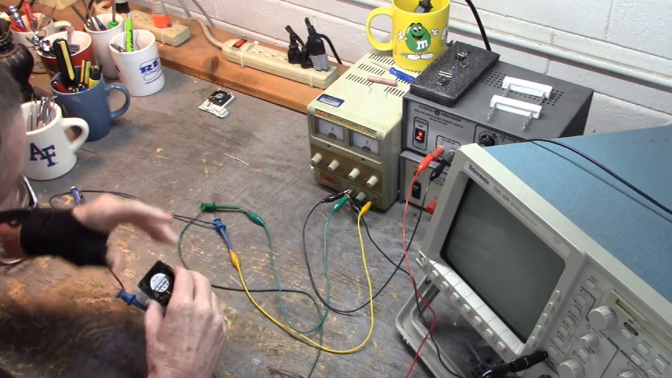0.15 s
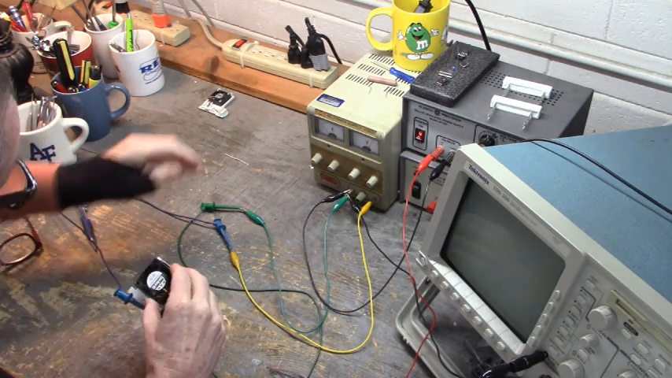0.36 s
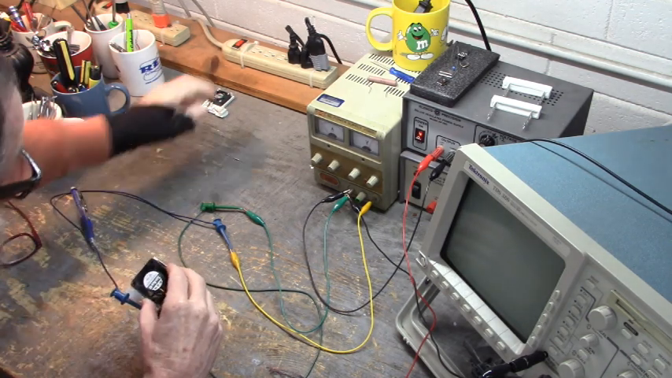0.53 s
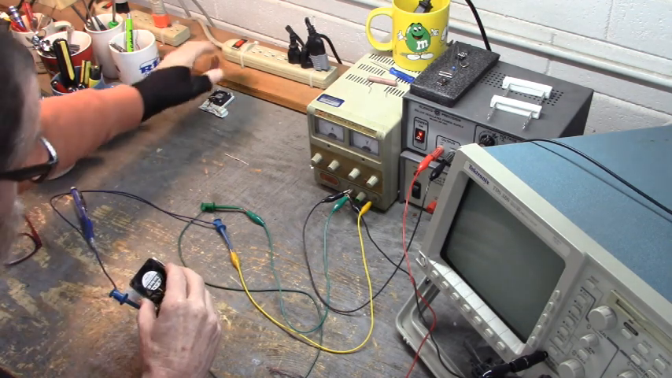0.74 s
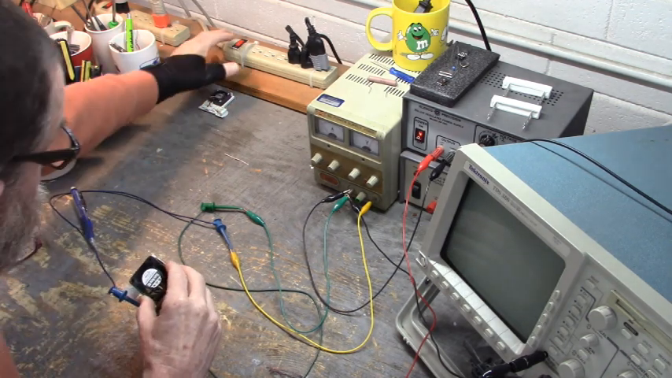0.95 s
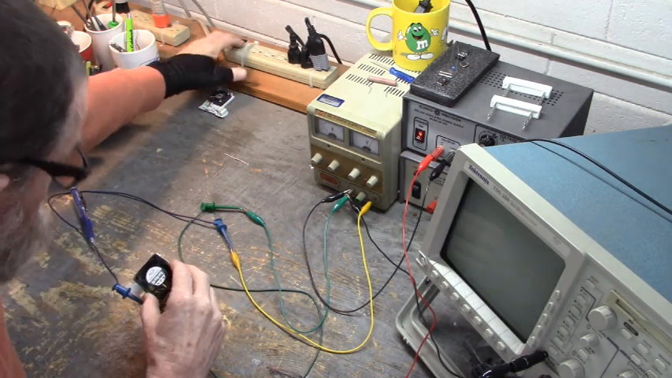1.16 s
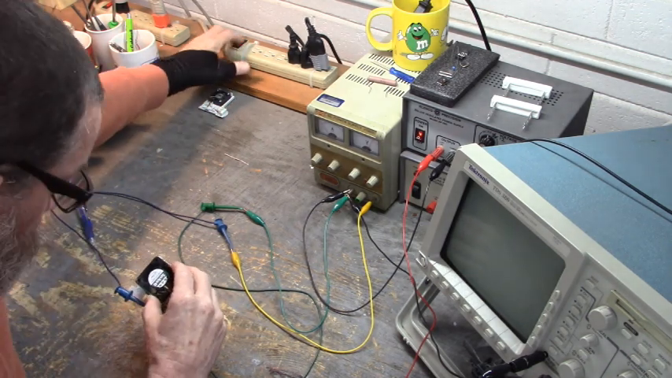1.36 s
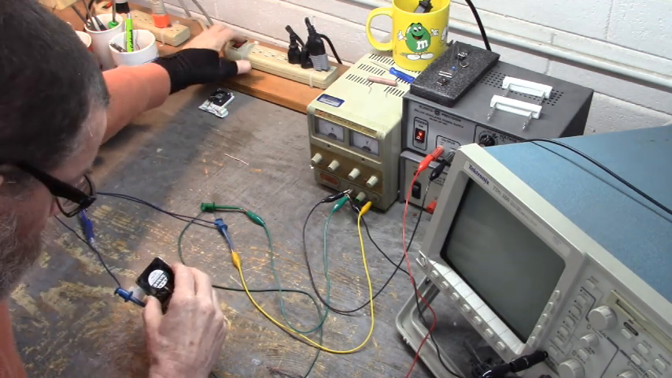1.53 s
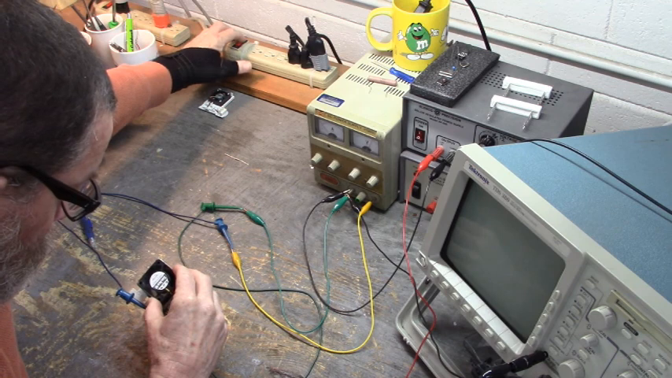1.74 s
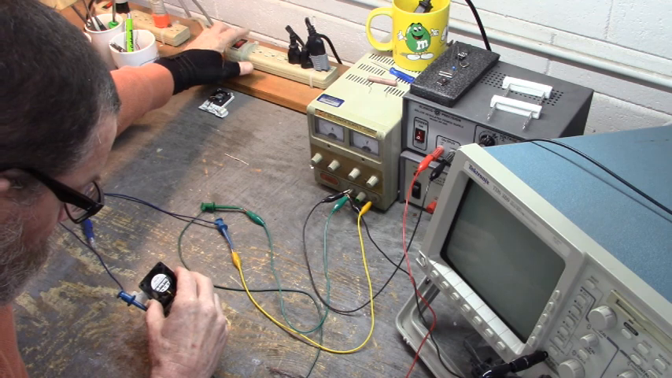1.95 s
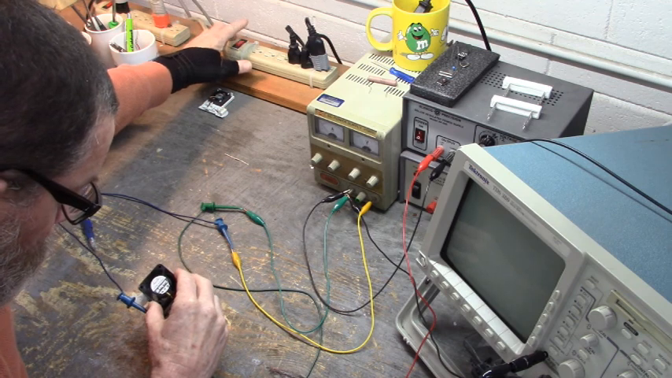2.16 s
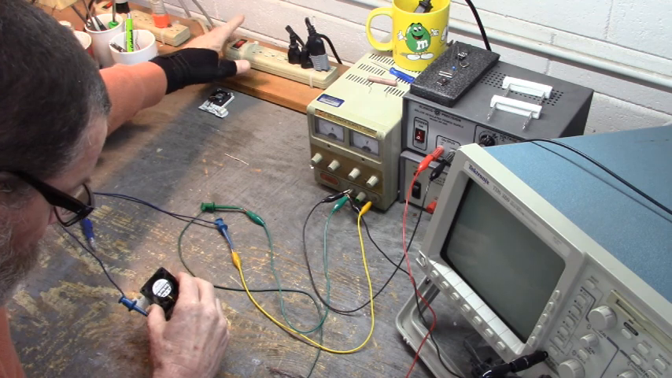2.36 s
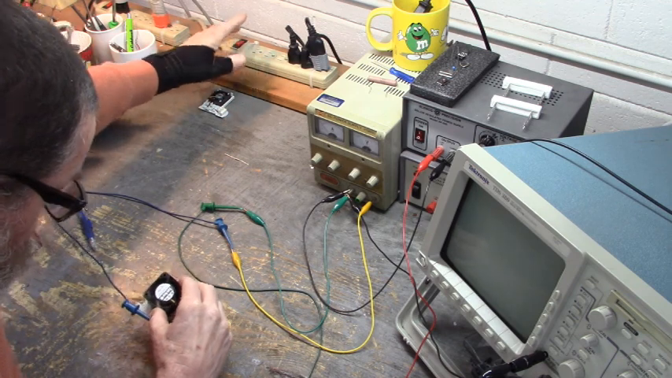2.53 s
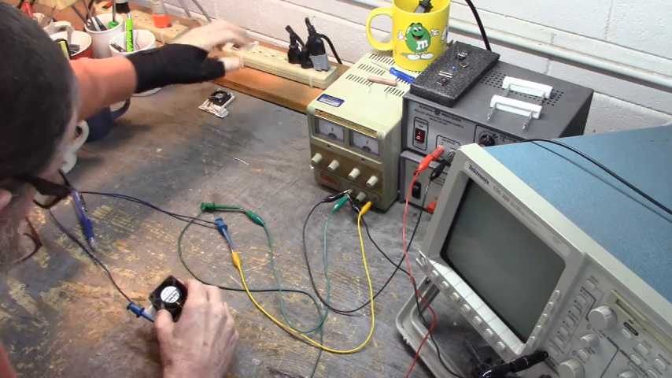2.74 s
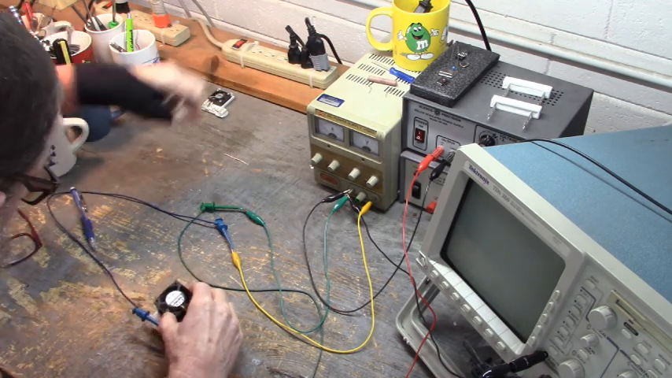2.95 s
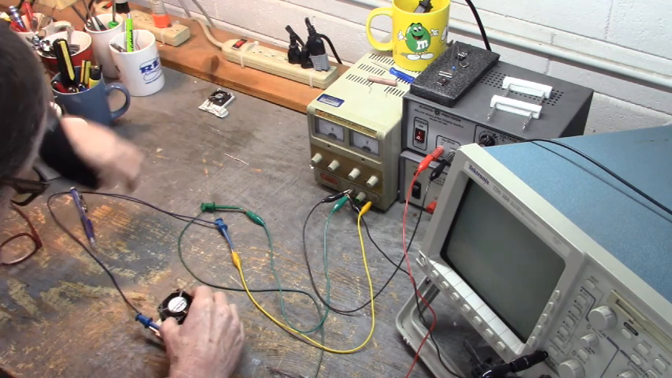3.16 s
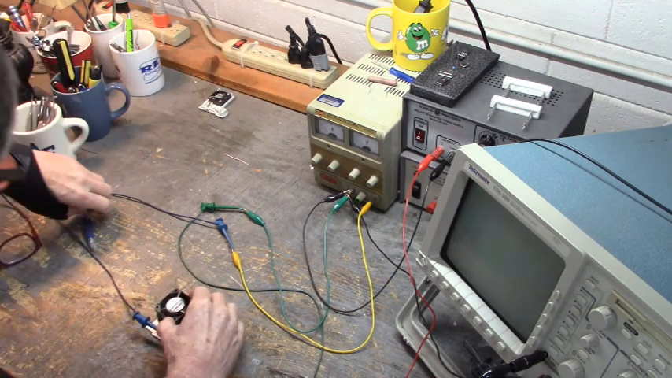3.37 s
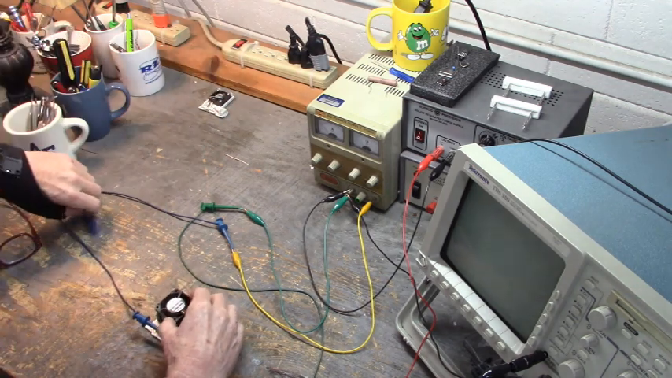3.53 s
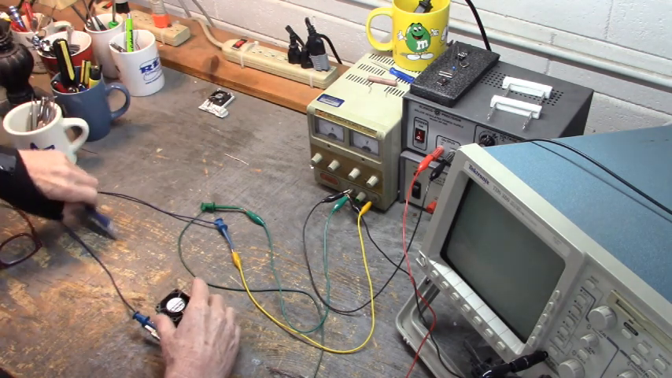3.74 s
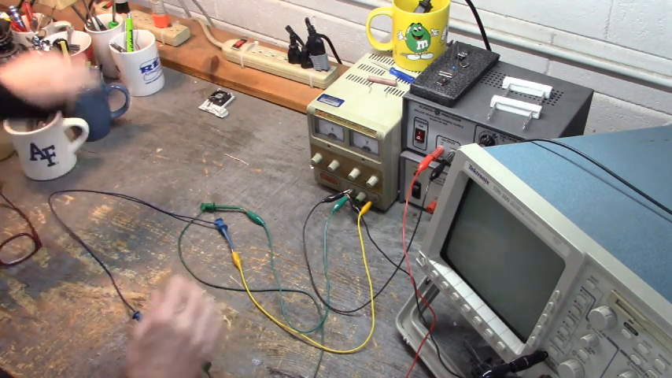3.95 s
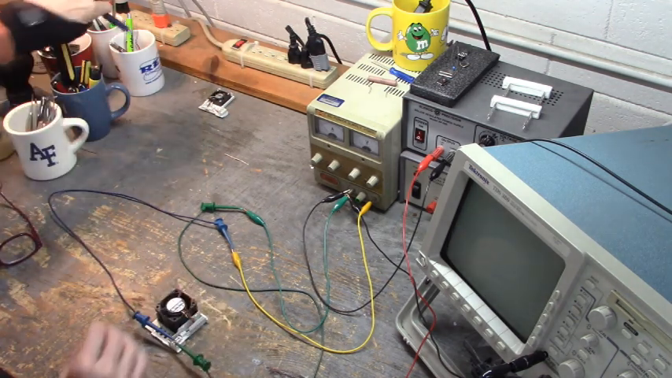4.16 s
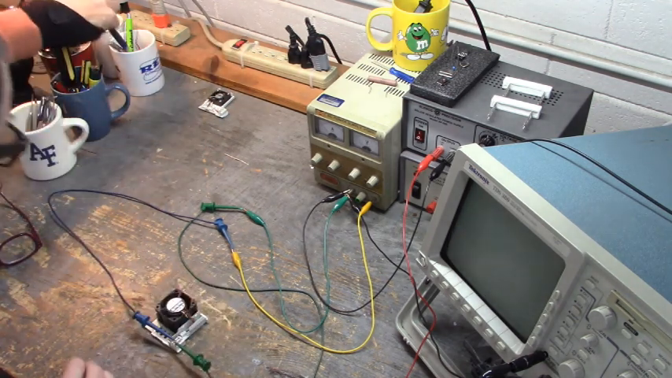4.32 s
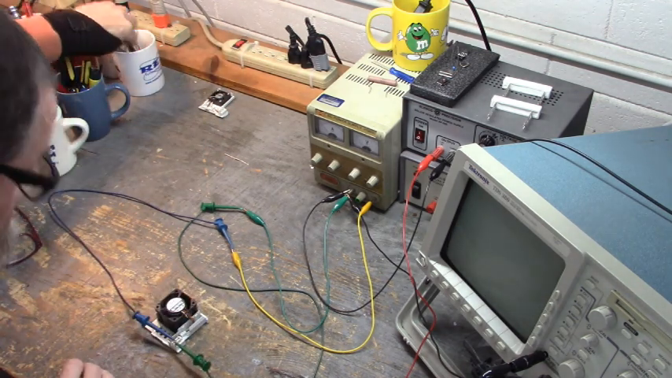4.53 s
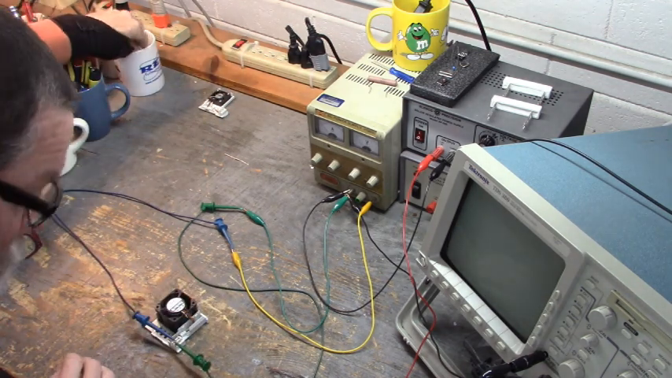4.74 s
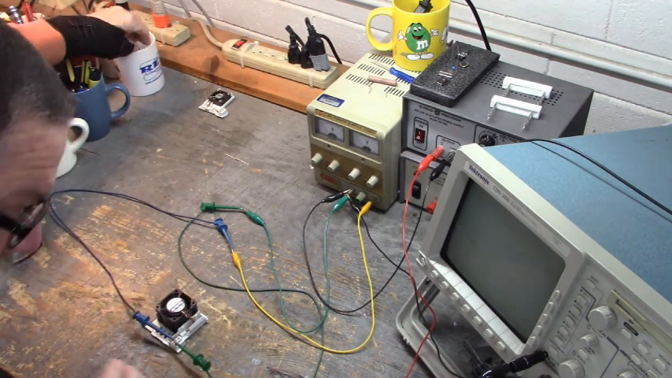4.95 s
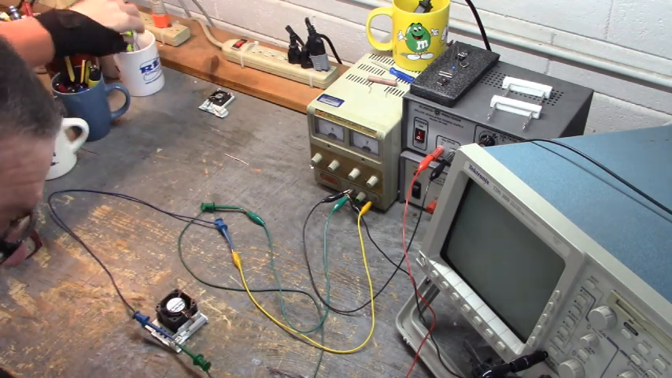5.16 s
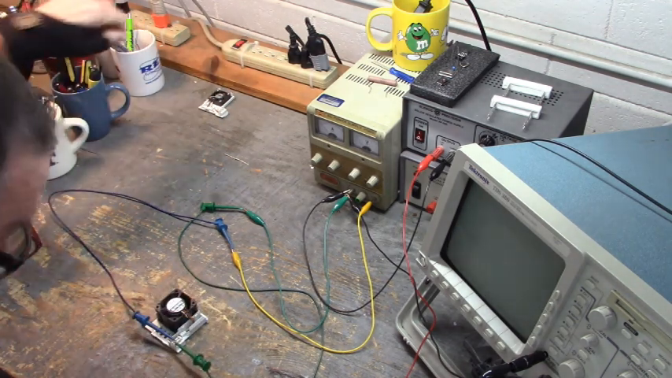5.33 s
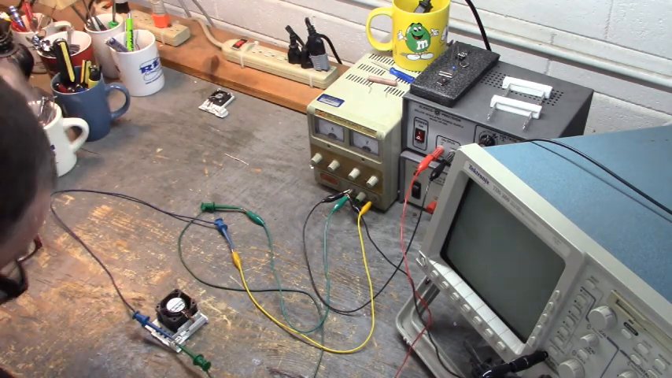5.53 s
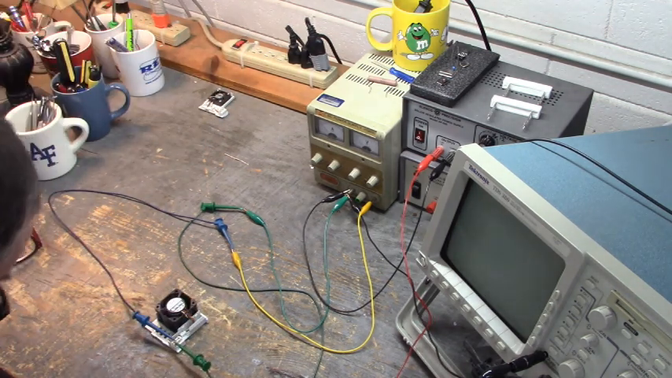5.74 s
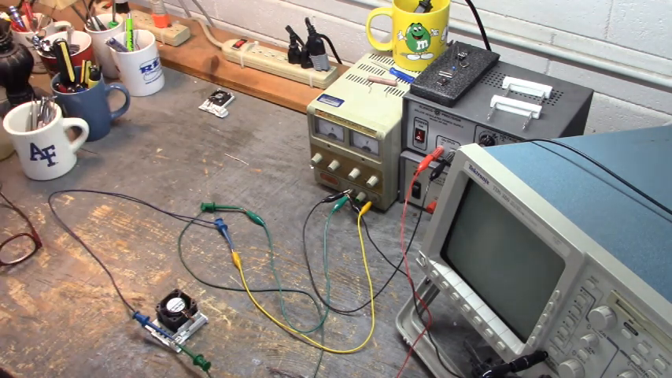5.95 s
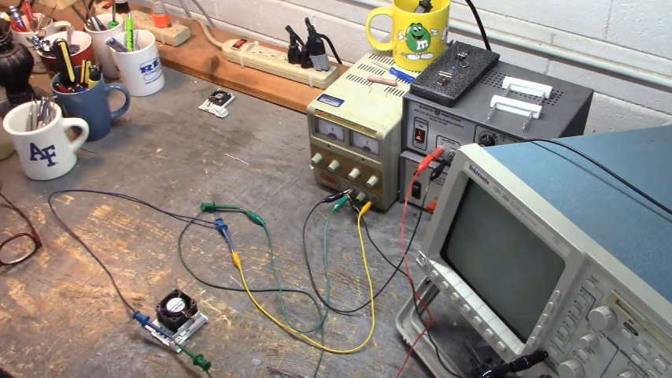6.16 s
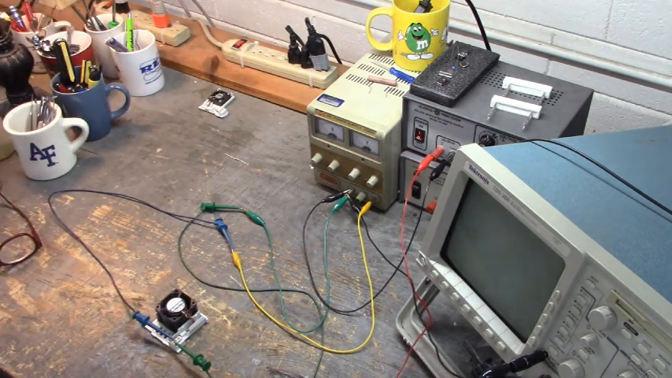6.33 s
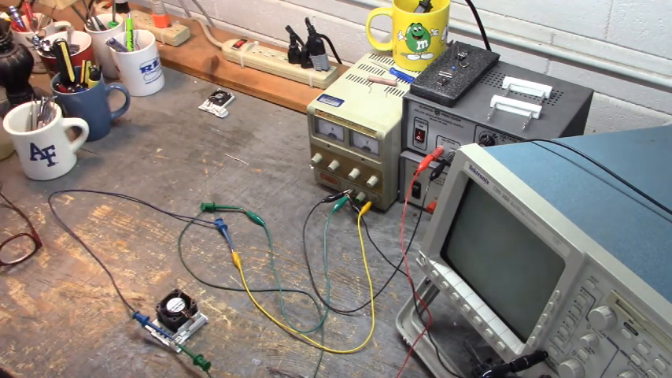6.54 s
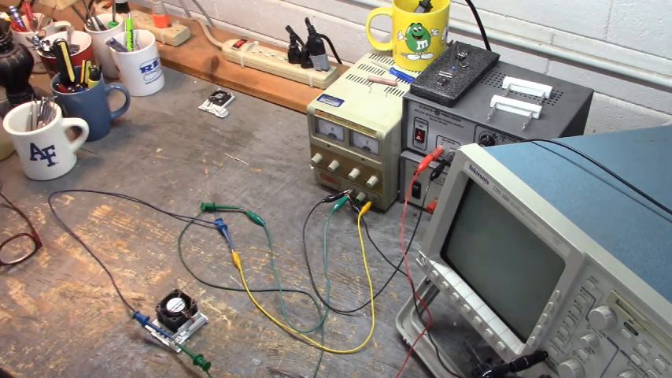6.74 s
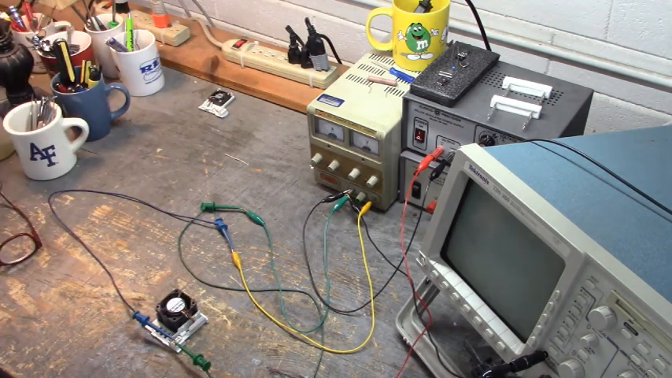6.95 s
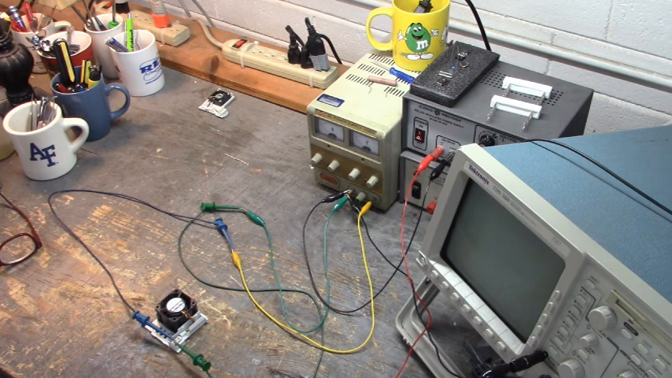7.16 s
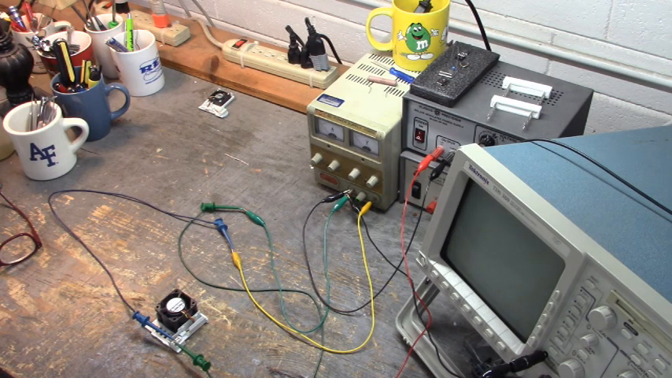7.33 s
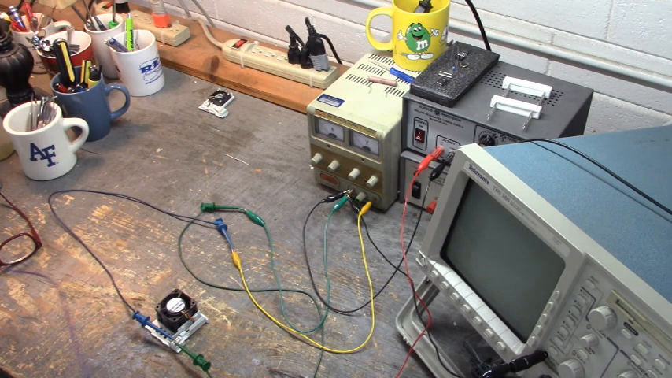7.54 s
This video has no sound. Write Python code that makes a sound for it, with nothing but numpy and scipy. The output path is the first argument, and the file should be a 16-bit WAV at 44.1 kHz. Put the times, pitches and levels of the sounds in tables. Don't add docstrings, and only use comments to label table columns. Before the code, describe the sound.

A small cooling fan whines steadily, a switch snaps, the pitch glides down and fades, then parts knock and a mug clinks on a workbench.

```python
import sys
import numpy as np
from scipy import signal
from scipy.fft import rfft, irfft
from scipy.io import wavfile
from scipy.ndimage import uniform_filter1d

SR = 44100
rng = np.random.default_rng(int(sys.argv[2]) if len(sys.argv) > 2 else 0)


def invert_db(level):
    return 10 ** (np.asarray(level, dtype=float) / 20)


def unload_wav(signal):
    wavfile.write(
        sys.argv[1],
        SR,
        np.round(np.clip(np.atleast_2d(signal).T, -1, 1) * 32767).astype(np.int16),
    )


N = 339129
HZ = np.fft.rfftfreq(512, 1 / SR)
T = np.arange(N // 128 + 5) * 128 / SR


def evened(x):
    return x / np.sqrt(np.mean(x ** 2) + 1e-20)


def read(points, hz):
    f, value = np.transpose(points)
    return np.interp(np.log(hz + 1), np.log(f + 1), value)


def follow(points, t):
    return np.interp(t, *np.transpose(points))


def add(mix, s, sound):
    part = mix[round(s * SR):][:len(sound)]
    part += sound[:len(part)]


def drift(t, top_hz, low_hz=0.284):
    coarse = t[::128]
    waves = [np.sin(2 * np.pi * (f * coarse + rng.random())) / np.sqrt(f)
             for f in np.geomspace(low_hz, top_hz, 12)]
    return np.interp(t, coarse, evened(sum(waves)))


def resonate(x, hz, width):
    turn = np.exp(2j * np.pi * np.cumsum(hz * np.ones(len(x))) / SR)
    r = np.exp(-np.pi * width / SR)
    return 2 * (turn * signal.lfilter([1 - r], [1, -r], x / turn)).real


def noise(field_db, same, patchy_db):
    a, b, c, d, patches = rng.standard_normal((len(T), len(HZ), 5)).T
    patches = uniform_filter1d(patches, size=6, axis=0)
    patches = evened(uniform_filter1d(patches, size=20, axis=1))
    same = np.clip(same, -1, 1)
    left = a + 1j * b
    right = same * left + np.sqrt(1 - same ** 2) * (c + 1j * d)
    z = np.array([left, right]) * invert_db(field_db + patchy_db * patches)
    return signal.istft(z, nperseg=512, noverlap=384)[1][:, :N]


def ring(modes, gains_db, length):
    t = np.arange(round(length * SR)) / SR
    return sum(invert_db(db + g - 60 * t / t60) * np.sin(2 * np.pi * hz * t)
               for (hz, db, t60), g in zip(modes, gains_db))


def burst(t60, rise):
    t = np.arange(4096) / SR
    return rng.standard_normal(len(t)) * invert_db(-60 * t / t60) * np.minimum(t / rise, 1)


FULL_HZ, WARMING_HZ_PER_S = 956.7, .8
COAST_S, SUPPLY_S = 1.6427, .1137
BEARING_PER_S, AIR_DRAG_HZ = .357, 911


def rotor(t):
    top = FULL_HZ + WARMING_HZ_PER_S * np.minimum(t, COAST_S)
    since = np.maximum(t - COAST_S, 0)
    braked = since - SUPPLY_S * (1 - np.exp(-since / SUPPLY_S))
    return 1 / ((1 / top + 1 / AIR_DRAG_HZ) * np.exp(BEARING_PER_S * braked) - 1 / AIR_DRAG_HZ)


# multiple of blade-pass, level in dB at full speed, power of speed,
# extra fade per squared dB of slowing.
STRONG = [(1, -37.5, 2.77, 0.35), (3, -46.5, 0.51, 0.14), (4, -37.5, 1.02, 0.36), (8, -50, 4.5, 0.5)]
# multiple of blade-pass, level in dB at full speed,
# change in dB when the motor drive stops.
ORDERS_DB = [(2, -54, 8), (5, -52.5, 0.5), (6, -48, -4), (7, -65, 8.5), (9, -56.5, -6.5), (10, -62, -4),
             (11, -75, 11), (12, -72, 4), (2.4, -67, 2), (3.2, -67, -3), (2.962, -55.5, -11),
             (5.963, -56, -8), (6.037, -56, 0)]
# multiple of blade-pass, width in Hz, level in dB.
WHISTLES = [(1.48, 113, -49.5), (3.46, 70, -62.5)]
# frequency in Hz, gain in dB.
FRAME = [(500, -10), (1200, 4.5), (1600, 7.5), (2400, -1.5), (4400, -3.5), (5600, 5.5), (6500, -3),
         (7300, 1.5), (8600, -5.5)]
# time in seconds, delay in ms.
ECHO = [(0, 0.35), (.2, 0.22), (.4, 0.17), (.65, 0.31), (.95, 0.31), (1.25, 0.32), (1.6, 0.378), (2, 0.38),
        (3.2, 0.39)]
ECHO_SHARE = 0.46
WALL_MS, WALL_SHARE = 4.6, 0.22
POWER_OFF_S = 1.66
SHADE_DB, SHADE_S = -3, .12
NOTCH_HZ, NOTCH_WIDTH_HZ, NOTCH_DB = 3390, 110, -12
COVER_S, COVER_DB_PER_OCTAVE, COVER_PIVOT = 3.0, -8, 1.7


def fan_tones():
    t = np.arange(round(3.4 * SR)) / SR
    hz = rotor(t)
    delay = follow(ECHO, t) / 1000
    turns = np.cumsum(hz) / SR
    slowed_db = 20 * np.log10(hz / hz[0])
    coasting = np.clip((t - POWER_OFF_S) / 0.08, 0, 1)
    flutter_db = .7 + 1.3 * coasting
    covered_db = COVER_DB_PER_OCTAVE * np.clip((t - COVER_S) / 0.12, 0, 1)
    shade_db = SHADE_DB * np.exp(-t / SHADE_S)

    def tone(k, db):
        notch_db = NOTCH_DB * np.exp(-((k * hz - NOTCH_HZ) / NOTCH_WIDTH_HZ) ** 2)
        hand_db = np.log2(k / COVER_PIVOT) * covered_db + shade_db
        level = invert_db(db + notch_db + hand_db + flutter_db * drift(t, 32, 7.))
        return level * np.sqrt(2) * np.sin(2 * np.pi * (k * turns + rng.random()))

    def echo(k):
        cycles = 2j * np.pi * k * hz
        hand = abs(1 + ECHO_SHARE * np.exp(cycles * delay))
        return hand * abs(1 + WALL_SHARE * np.exp(cycles * WALL_MS / 1000))

    def frame_db(k):
        return read(FRAME, k * hz) - read(FRAME, k * hz[0])

    out = np.zeros(len(t))
    for k, db, law, bend in STRONG:
        fade_db = law * slowed_db - bend * slowed_db ** 2
        out += echo(k) * tone(k, db + fade_db + (k > 4) * frame_db(k))
    for k, db, off_db in ORDERS_DB:
        wander_db = np.log2(k) * coasting * drift(t, 8, 2.52)
        out += tone(k, db + off_db * coasting + wander_db + 2.53 * slowed_db + frame_db(k))
    for k, width, db in WHISTLES:
        whistle = resonate(rng.standard_normal(len(t)), k * hz, width)
        out += evened(resonate(whistle, k * hz, width)) * invert_db(db + 1.9 * slowed_db)
    return np.pad(out * np.clip((t[-1] - t) / 0.13, 0, 1), (0, N - len(t)))


# frequency in Hz, level in dB per Hz.
AIR = [(100, -26.5), (300, -7.5), (700, -2.5), (1150, -1.5), (1700, -3.5), (2900, 0.5), (3800, 0),
       (4600, -3.5), (5500, 2), (6250, -6), (7600, -1.5), (9500, -9.5), (12000, -16.5), (15800, -30)]
AIR_DB = -39
# frequency in Hz, power of speed.
AIR_LAW = [(300, 2.9), (1500, 1.8), (5000, 3.35), (12000, 4.36)]
# time in seconds, gain in dB.
FACING = [(0, 0.3), (.8, 0.2), (1.4, -0.1), (2.1, 1.6), (2.8, 0.2), (3.6, 2.5)]
STOP_S = 3.25


def fan_air():
    slowed_db = 20 * np.log10(rotor(T) / FULL_HZ) - 40 * np.maximum(T - STOP_S, 0)
    field = read(AIR, HZ)[:, None] + read(AIR_LAW, HZ)[:, None] * slowed_db + follow(FACING, T)
    air = noise(field, 1.0, 1.6)
    return invert_db(AIR_DB) * air / np.std(air[:, :SR])


# frequency in Hz, level in dB, seconds to die by 60 dB.
SWITCH = [(670, -11, .045), (800, -11, .035), (1507, -7, .025), (1820, -10, .012), (2900, -5, .013),
          (3560, 1, .013), (3881, -1, .012), (5600, -10, .012), (6500, -7, .016), (7300, -3, .014),
          (8339, -4, .014), (10280, -8, .01), (12500, -10, .008)]
# start in seconds, peak in dB, brightness in dB per octave, seconds of creak before it.
SNAPS = [
    (1.647, -5, 2, 0.0013),
    (1.735, -15.5, 8, .007),
]


def switch(mix):
    for s, db, tilt_db, creak in SNAPS:
        body = ring(SWITCH, [tilt_db * np.log2(m[0] / 3500) for m in SWITCH], .1)
        blows = burst(.015, creak) * (rng.random(4096) < .3)
        crack = resonate(burst(0.052, creak), 6600, 10300)
        sound = signal.oaconvolve(blows, body)
        add(mix, s - creak, invert_db(db) * sound / abs(sound).max())
        add(mix, s - creak, invert_db(db - 11) * crack)


# frequency in Hz, seconds to die by 60 dB.
PARTS = [(1300, 0.091), (1610, .05), (2100, 0.075), (3900, 0.039), (4900, 0.037)]
# frequency in Hz, level in dB, seconds to die by 60 dB.
BENCH = [(229, 2.5, 0.017), (379.4, 3, 0.12), (482, -2, 0.066), (554, 5.5, 0.015), (704, 5.5, 0.03),
         (793, 14.5, 0.018), (905, -3.5, 0.026), (1110, -10, 0.056)]
# start in seconds, part peak in dB, bench thump in dB, bright tick in dB.
FRAME_KNOCKS = [
    (3.2925, -51, -40, -53),
    (4.6345, -36, -34.5, -52),
    (4.6474, -49, -29.5, -41),
    (4.6638, -31, -26, -28),
    (4.6844, -39, -26.5, -40),
    (4.8126, -46, -38, -58),
    (6.4148, -36, -48, -45),
    (6.7085, -40, -39, -46.5),
]
HANDLE_KNOCKS = [(3.275, -37.5, -34, -64), (3.3255, -46, -36, -47.5), (4.5437, -45, -44.5, -64),
                 (5.5017, -41, -35, -46), (5.6604, -35, -54, -55), (5.757, -53, -45.5, -50),
                 (6.0145, -50, -47, -50), (6.436, -31.5, -36.5, -48), (6.924, -33, -42.5, -51.5),
                 (6.9289, -44, -46, -43), (7.168, -54, -64.5, -69), (7.557, -40, -51, -66)]
PLUG_KNOCKS = [
    (3.3807, -45.5, -39.5, -64),
    (3.9267, -42, -65, -61),
    (5.4555, -34, -36.5, -47),
    (5.7033, -47.5, -54, -63),
]
TOOL_KNOCKS = [
    (1.7514, -30, -40, -45.5),
    (4.3294, -39, -38, -52),
    (4.3957, -40.5, -35.5, -52),
    (4.5003, -45, -43.5, -56),
    (4.5943, -44.5, -39, -61),
    (4.9165, -46, -41, -48),
    (4.982, -27.5, -25, -29),
]
CLIP_KNOCKS = [
    (3.47, -38.5, -40, -57),
    (3.639, -38.5, -55.5, -34),
    (4.2772, -24.5, -33, -30),
    (4.779, -46, -43, -36),
    (6.437, -44, -47, -39.5),
]


def knocks(mix):
    bright = signal.butter(2, [4000, 9500], "band", fs=SR, output="sos")
    tables = FRAME_KNOCKS, HANDLE_KNOCKS, PLUG_KNOCKS, TOOL_KNOCKS, CLIP_KNOCKS
    for rows, (hz, t60) in zip(tables, PARTS):
        for s, part_db, thump_db, tick_db in rows:
            part = resonate(resonate(burst(t60, 0.00077), hz, 1.1 * hz), hz, 1.1 * hz)
            bench = ring(BENCH, 2.8 * rng.standard_normal(len(BENCH)), 0.14)
            thump = signal.oaconvolve(burst(0.041, 0.0059), bench)
            tick = signal.sosfilt(bright, burst(0.83 * t60, 0.00048))
            for sound, db in ((part, part_db), (thump, thump_db), (tick, tick_db)):
                add(mix, s, invert_db(db) * sound / abs(sound).max())


# frequency in Hz, level in dB, seconds to die by 60 dB.
MUG = [
    [(2720, -37, 1.9), (2800, -30, 0.93), (2760, -30.5, 2.9), (2762, -33, 0.84), (2870, -39, 0.16)],
    [(5491, -18, 0.42), (7280, 2, 0.18), (13635, -16, .09)],
    [(4303, -4, 0.47), (7720, -1, 0.28), (8805, -7.5, 0.46)],
    [(2888, 5.5, 0.15), (11140, -1, 0.093), (12300, -8, .08), (12050, -4, .12)],
]
# frequency in Hz, level in
# dB, seconds to die by 60 dB.
BELL = [(2735, 0, 1.5)]
MUTED_S = .051
# start in seconds, then the level in dB of each of the four families.
CLINKS = [
    (4.277, -37, -42, -42, -48),
    (4.330, -42, -53, -58, -51),
    (4.397, -45.5, -66, -55.5, -53),
    (4.502, -49, -59, -71, -52),
    (4.589, -60, -68, -75, -63),
    (4.664, -50, -58, -56, -61),
    (4.916, -49.5, -72, -76, -67),
    (4.983, -18.5, -33.5, -61, -44),
]


def mug(mix):
    families = [ring(modes, np.zeros(len(modes)), .36) for modes in MUG]
    t = np.arange(len(families[0])) / SR
    families[0] += ring(BELL, [0], .36) * np.cos(np.pi / 2 * np.minimum(t / MUTED_S, 1))
    fade = np.clip((.36 - t) / 0.044, 0, 1)
    for s, *family_db in CLINKS:
        clink = sum(invert_db(db) * sound for db, sound in zip(family_db, families))
        add(mix, s, clink * fade)


# middle in seconds, length in seconds, rms level in dB, centre in Hz.
RUBS = [
    (1.753, .043, -41, 460),
    (3.325, .05, -47, 800),
    (5.498, .043, -50, 480),
    (6.722, .039, -50, 546),
    (7.512, .015, -66, 7460),
]
PINGS = [
    (3.479, .04, -53, 4900),
]
RUMBLES = [
    (3.354, 0.2, -56, 159),
    (3.513, .11, -68, 80),
    (4.32, .11, -49, 498),
    (4.41, .06, -47.5, 450),
    (5.022, .11, -50, 330),
    (5.93, .21, -56, 183),
    (6.97, 0.078, -65, 6000),
    (7.562, 0.026, -60.5, 4970),
]
SWISHES = [(3.331, 0.064, -51, 990), (3.46, 0.058, -51.5, 890), (4.648, .044, -47, 1200),
           (4.685, 0.093, -45, 980), (4.68, .067, -45, 7950), (5.027, .06, -57, 6000),
           (5.379, 0.042, -51.5, 2180), (5.5, .14, -56.5, 1810), (5.97, 0.046, -60, 7950),
           (6.089, .089, -56, 8900), (6.224, 0.15, -63.5, 7000), (6.336, 0.055, -62, 5000),
           (6.442, 0.072, -54.5, 2505), (7.273, .086, -69.5, 6000)]
DRAG_OCTAVES = [.3, .09, .7, 1.25]


def scrapes(mix):
    for rows, octaves in zip((RUBS, PINGS, RUMBLES, SWISHES), DRAG_OCTAVES):
        for s, length, db, hz in rows:
            n = round(1.5 * length * SR)
            grain_db = 2.0 * evened(uniform_filter1d(rng.standard_normal(n), size=90))
            grit = rng.standard_normal(n) * invert_db(grain_db)
            away = np.log2((np.fft.rfftfreq(n, 1 / SR) + 1) / hz) / octaves
            drag = evened(irfft(rfft(grit) * invert_db(-6 * away ** 2), n))
            add(mix, s - n / 2 / SR, invert_db(db) * drag * np.hanning(n))


# time in seconds, level of the dull rustle in dB.
BUSY = [(3.2, -59.5), (3.334, -38), (4.25, -39), (4.92, -39.5), (5.38, -34.5), (6.27, -34), (6.6, -39.5),
        (6.9, -47), (7.69, -53)]
SHEEN_DB, SHEEN_SHARE = -64, .45
SWEEP_S, SWEEP_HALF_S, SWEEP_DB = 6.2, .25, -44


def rustle():
    busy_db = follow(BUSY, T)
    sweep = invert_db(SWEEP_DB - 20 * ((T - SWEEP_S) / SWEEP_HALF_S) ** 2)
    sheen = np.hypot(invert_db(SHEEN_DB + SHEEN_SHARE * (busy_db + 38)), sweep)
    octave = np.log2(HZ[:, None] + 20)
    dull = invert_db(busy_db - 1.46 * (octave - np.log2(700)) ** 2)
    bright = sheen * invert_db(-9.4 * (octave - np.log2(6500)) ** 2 - 8)
    flicker_db = 1.8 * evened(uniform_filter1d(rng.standard_normal(len(T)), size=3))
    top_loss_db = 3.0 * np.maximum(HZ[:, None] / 1000 - 11, 0)
    still_db = 60 * (T < BUSY[0][0])
    field = 20 * np.log10(np.hypot(dull, bright)) + flicker_db - top_loss_db - 37.5 - still_db
    return noise(field, 1.0, 3.5)


# frequency in Hz, seconds to die by 60 dB.
ROOM = [(200, 0.68), (1000, 0.29), (4000, 0.31), (12000, 0.1)]


def room(x):
    taps = np.zeros((2, SR // 2))
    slots = np.arange(300, SR // 2 - 20, 20)
    at = slots + rng.integers(0, 20, (2, len(slots)))
    np.put_along_axis(taps, at, rng.choice([-1., 1.], at.shape), 1)
    taps = taps[0] + np.array([[.12], [-.12]]) * taps[1]
    hz, t, z = signal.stft(taps, SR, nperseg=256)
    dying = invert_db(-60 * t / read(ROOM, hz)[:, None])
    tail = signal.istft(z * dying, SR, nperseg=256)[1]
    return signal.fftconvolve(x[None], tail / np.linalg.norm(tail[0]), axes=1)[:, :N]


# frequency in Hz, level in dB per Hz.
ROOM_AIR = [(20, -17), (50, -19), (85, -7), (160, -1.5), (250, -0.5), (400, -1.5), (630, -4), (1000, -9.5),
            (1600, -10.5), (2100, -14.5), (4000, -18.5), (8000, -23), (13500, -32.5), (16000, -39)]
ROOM_DB = -56.5
# frequency in Hz, level in dB.
HUM = [(120, -67.5), (240, -74.5), (370, -69.5)]
# frequency in Hz, likeness from 0 to 1.
SAME = [(60, 0.64), (180, 0.65), (550, 0.68), (1650, 0.69), (4970, 0.78), (15000, 0.85)]


def room_air():
    t = np.arange(N) / SR
    hum = sum(invert_db(db + 1.6 * drift(t, 6)) * np.sqrt(2) * np.sin(2 * np.pi * hz * t) for hz, db in HUM)
    hz = np.fft.rfftfreq(N, 1 / SR)
    same = np.clip(read(SAME, hz), -1, 1)
    left, other = rfft(rng.standard_normal((2, N))) * invert_db(read(ROOM_AIR, hz))
    air = irfft(np.array([left, same * left + np.sqrt(1 - same ** 2) * other]), N)
    return hum + invert_db(ROOM_DB + 0.31 * drift(t, 4.8)) * evened(air)


def band(x, lo_hz, hi_hz):
    return signal.sosfilt(signal.butter(3, [lo_hz, hi_hz], "band", fs=SR, output="sos"), x)


def scene():
    tones = fan_tones()
    snaps, bumps, drags, rings = np.zeros((4, N))
    switch(snaps)
    knocks(bumps)
    mug(rings)
    scrapes(drags)
    hits = band(snaps, 570, 13300) + band(bumps, 220, 15000) + band(drags, 50, 11000)
    wet = room(invert_db(-12) * hits + invert_db(-20) * rings + invert_db(-22) * tones)
    near = tones + fan_air() + hits + rings
    slope = np.roll(near[0], -1) - np.roll(near[0], 1)
    apart = invert_db(-24.0) * slope * np.array([[1], [-1]])
    return near + apart + wet + rustle() + room_air()


def low_pass(x):
    return signal.sosfilt(signal.butter(12, 16830, fs=SR, output="sos"), x)


def record(dry):
    mix = dry * invert_db(np.array([[.2], [-.2]]))
    return low_pass(mix)


dry = scene()
out = record(dry)
unload_wav(out)
```